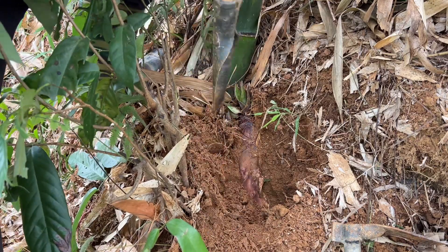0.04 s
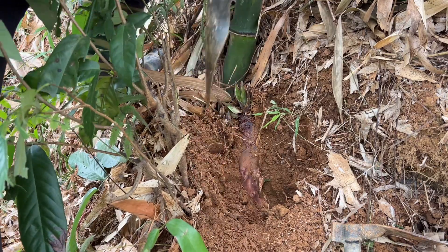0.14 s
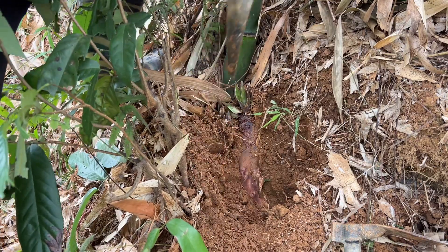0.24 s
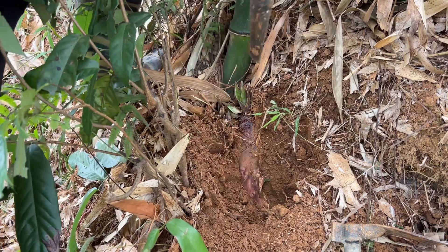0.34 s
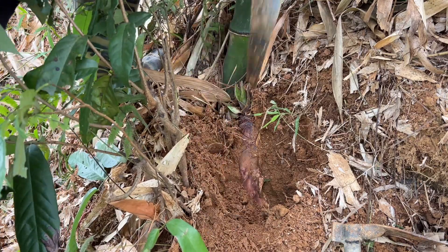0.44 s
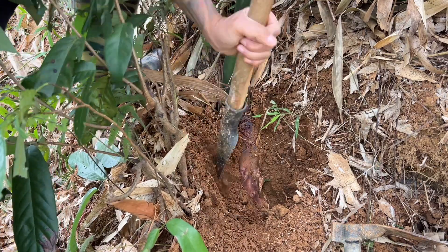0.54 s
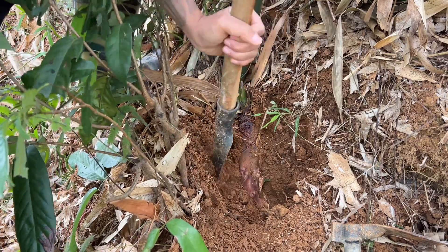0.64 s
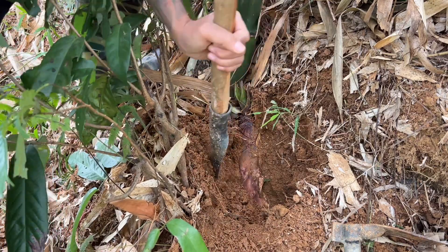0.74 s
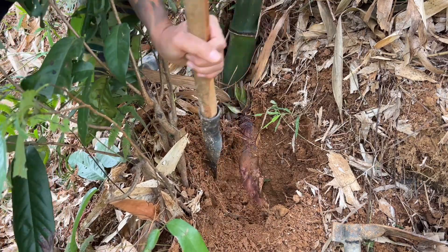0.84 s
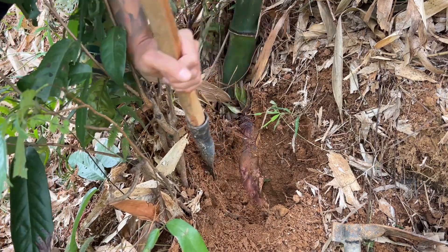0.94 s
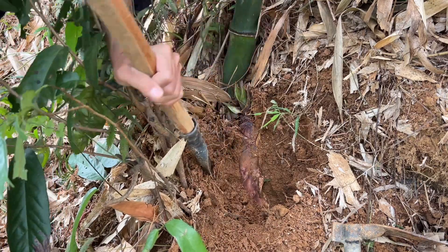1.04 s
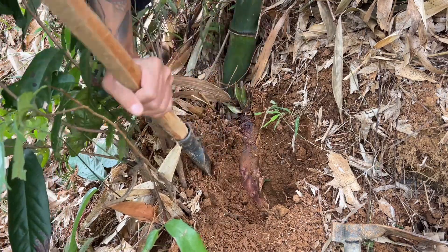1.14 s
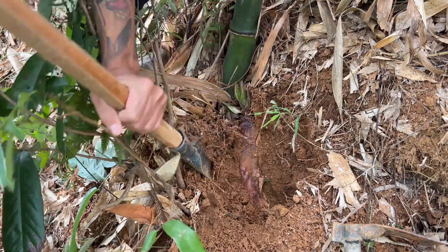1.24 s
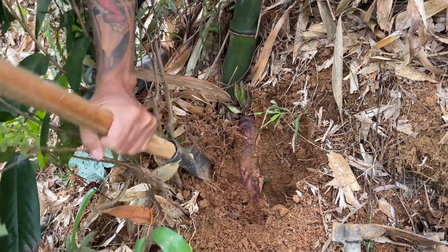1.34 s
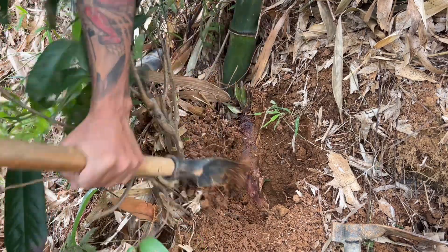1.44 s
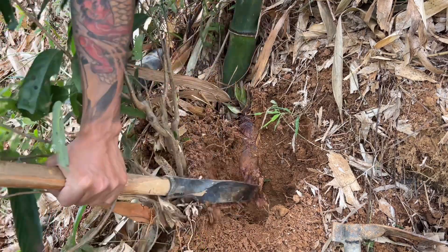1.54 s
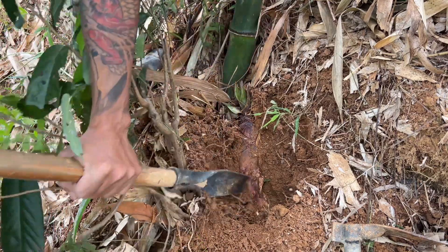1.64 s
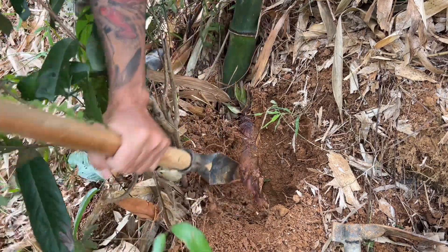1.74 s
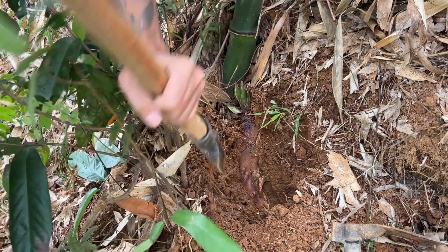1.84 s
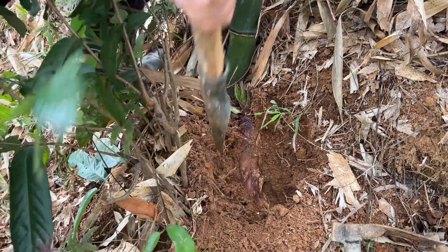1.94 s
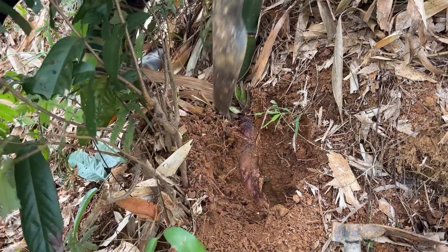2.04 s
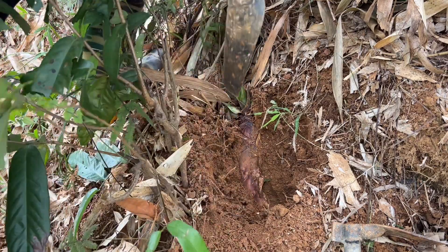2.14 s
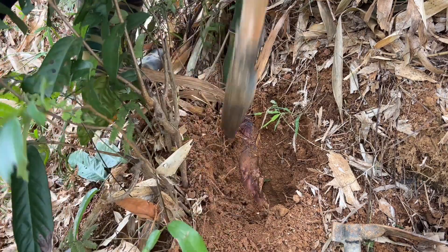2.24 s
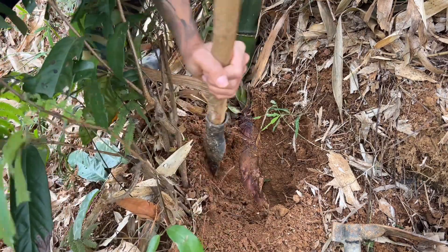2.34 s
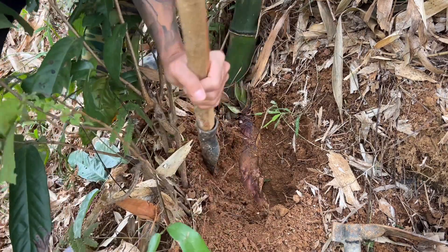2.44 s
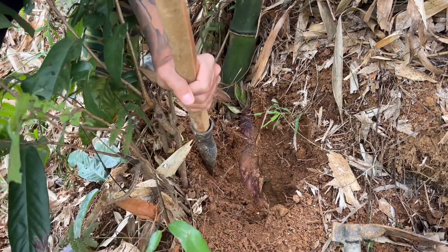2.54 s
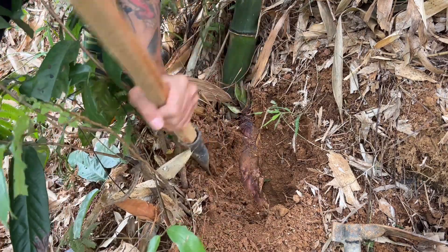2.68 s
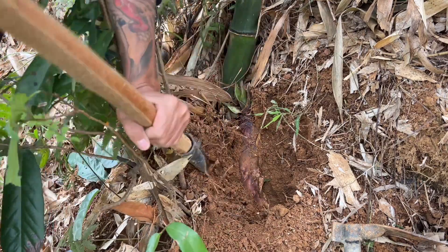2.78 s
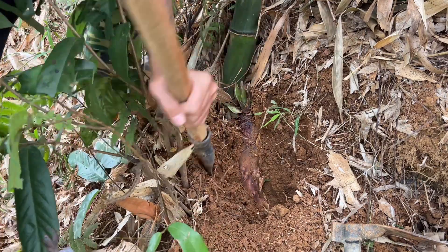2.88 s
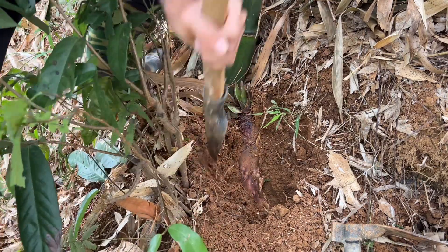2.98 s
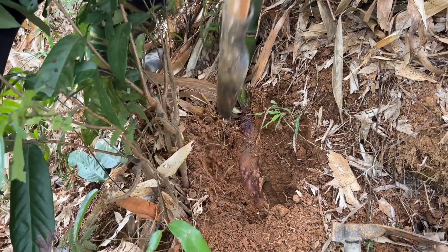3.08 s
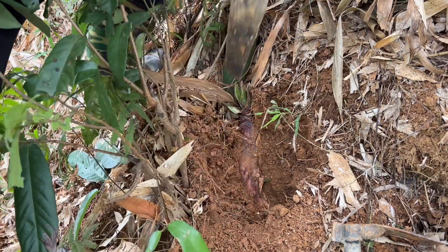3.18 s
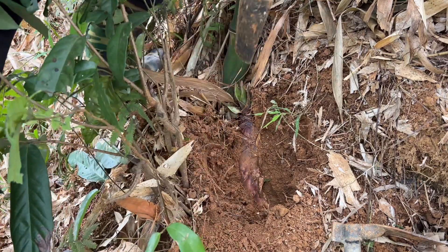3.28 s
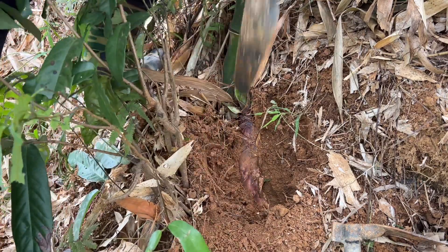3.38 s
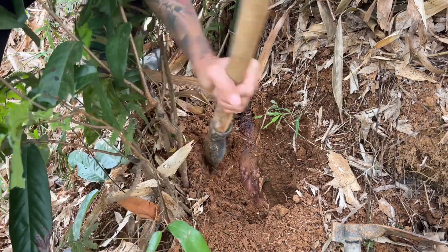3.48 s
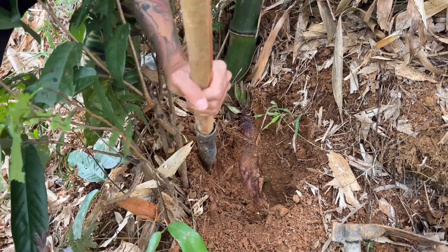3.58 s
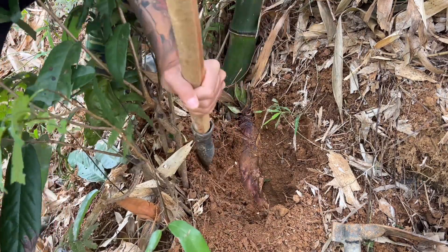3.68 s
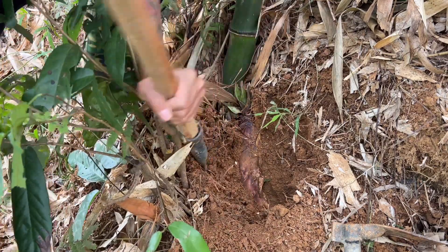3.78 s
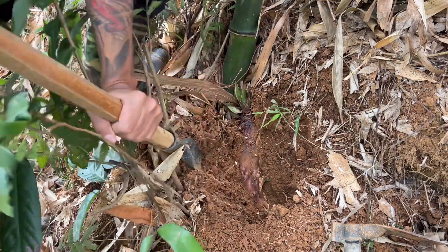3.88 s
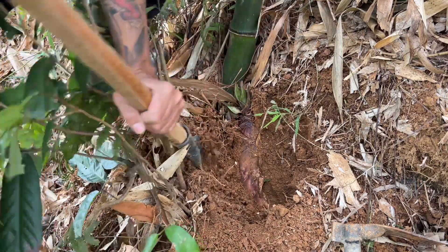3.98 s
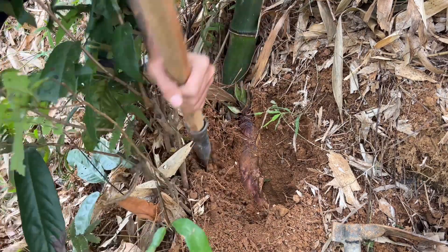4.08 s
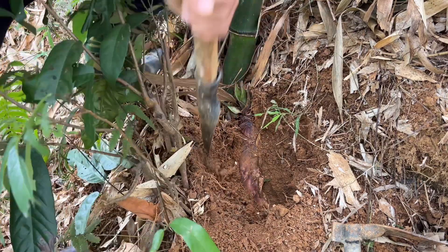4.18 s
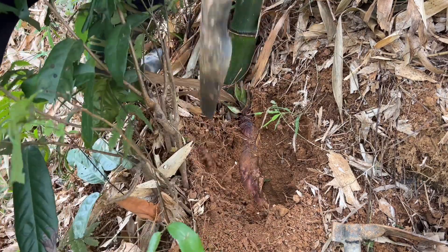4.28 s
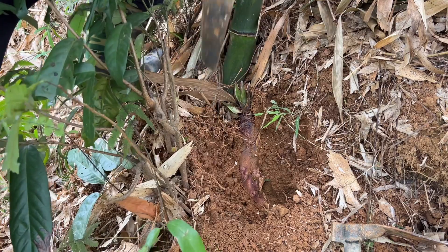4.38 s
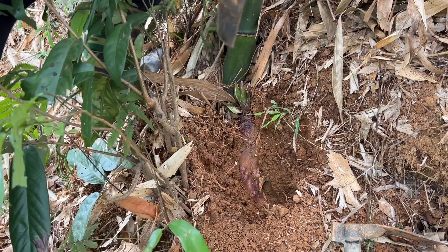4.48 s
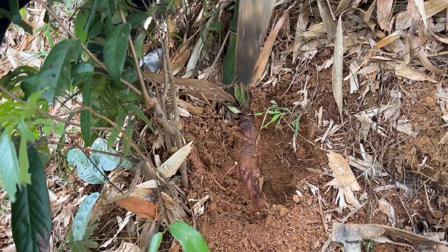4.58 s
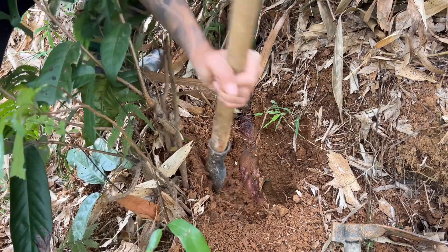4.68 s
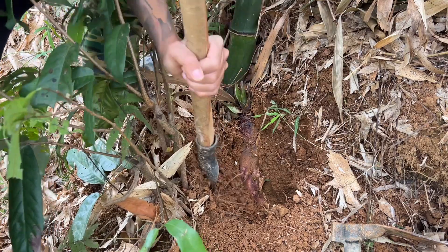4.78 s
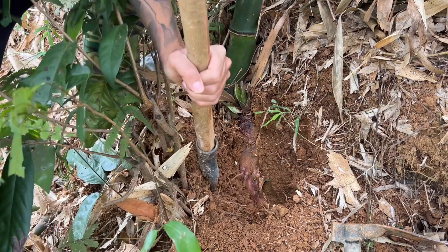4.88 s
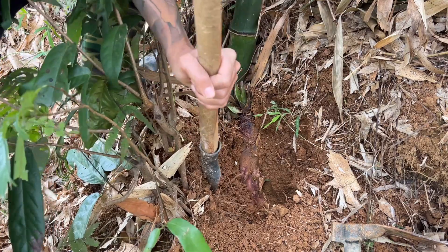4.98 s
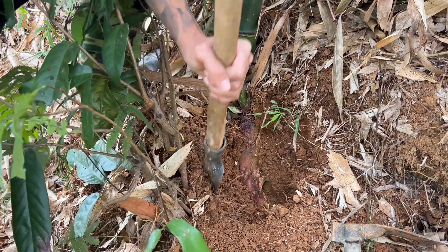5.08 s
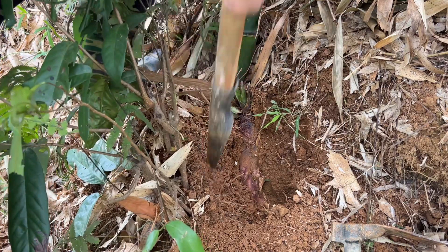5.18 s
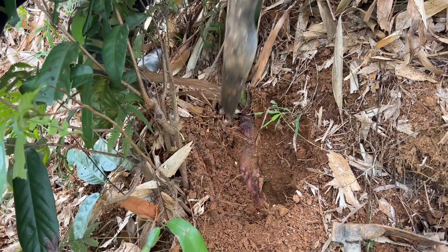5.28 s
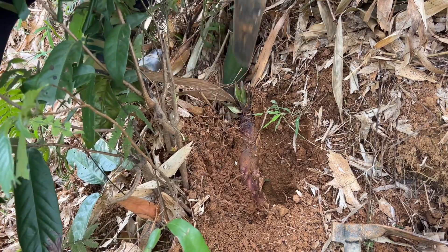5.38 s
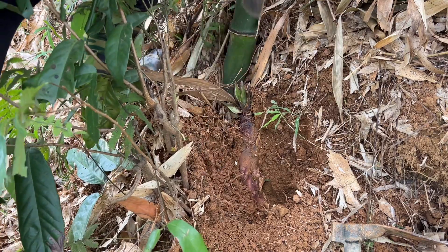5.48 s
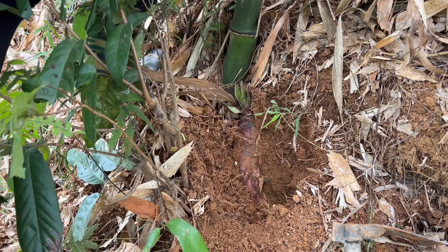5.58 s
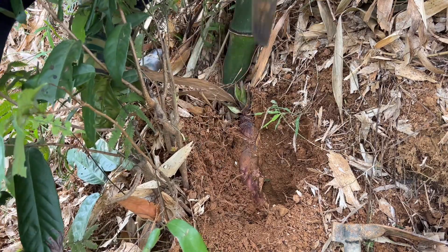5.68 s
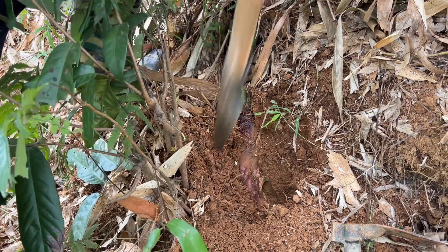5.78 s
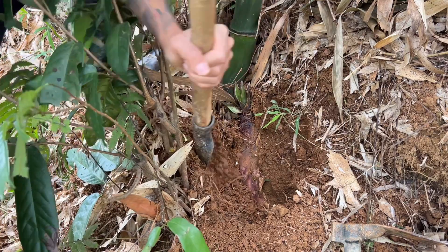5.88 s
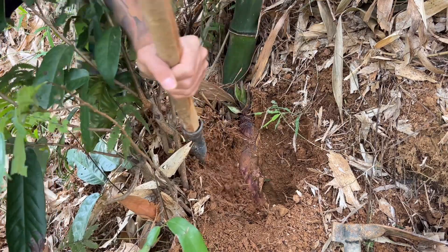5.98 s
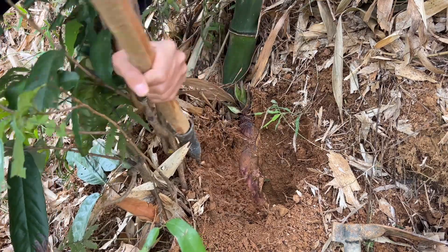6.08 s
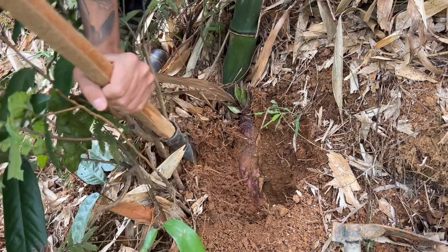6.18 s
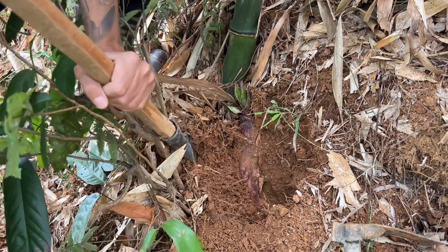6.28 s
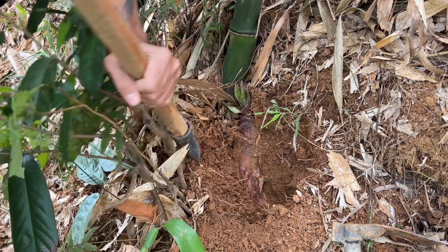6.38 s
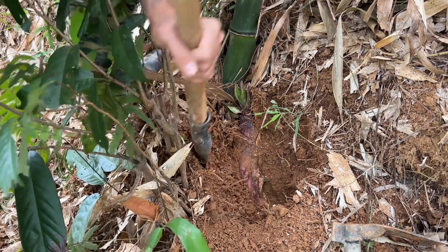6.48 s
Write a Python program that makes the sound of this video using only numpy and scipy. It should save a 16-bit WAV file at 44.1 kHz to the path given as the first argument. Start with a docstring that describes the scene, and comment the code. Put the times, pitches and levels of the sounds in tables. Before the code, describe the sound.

A close outdoor stereo perspective in a grove, nearly dry with a very short diffuse echo. Quiet leaf ticks and faint rustle lead to the first hoe chop at 0.6 seconds: a brief crunch, bright crack, hollow knock and low damped thud. Dull earth shifts follow; around 1.45 to 1.55 the blade clicks on roots, scrapes grit and rings faintly. A firmer chop lands at 2.4, with small knocks and a drag near 2.8. The third, at 3.55, is sharp and woody, then clods patter and grit scrapes near 3.9. The fourth, at 4.75, is softer and duller, with clicks just after. The fifth, at 5.9, is heaviest, followed by strong knocks at 6.05 and 6.3 and dull lurching earth. Crumbs, dry snaps and leaf rustle continue, stronger left. Low air rumble comes in puffs, swelling around 4.2 and at the end near 6.5.

```python
"""A narrow steel hoe on a wooden handle chops five times into soil in a grove, close to the microphone.
Each blow is a crunch of fractures with a short falling squeak, a knock and low damped ground modes.
Between blows the blade catches on roots and stones, drags through grit and rings as it slides free.
Filtered random grains make crumbs, leaves and clods nearby; the grove returns a short noise tail.
Shaped low noise is the moving air that rumbles on the microphone."""
import sys
import numpy as np
from scipy import signal
from scipy.fft import rfft, irfft, next_fast_len
from scipy.io import wavfile

SR = 44100
rng = np.random.default_rng(int(sys.argv[2]) if len(sys.argv) > 2 else 0)


def waveform_to_disk(signal):
    """Save audio, clipped to [-1, 1], as 16-bit WAV at the path in sys.argv[1]."""
    frames = np.transpose(np.atleast_2d(signal))
    scaled = np.clip(frames, -1, 1) * 32767
    samples = np.round(scaled).astype(np.int16)
    wavfile.write(sys.argv[1], SR, samples)


N = 287864
TIME = np.arange(N) / SR
BURST = np.arange(8192) / SR   # time axis of one short sound [s]

# Chops: (blade stops [s], bite length [s], bite below crunch [dB], crunch [dB], blade [dB],
# blade centre [Hz], crack [dB], crack [Hz], knock [dB], knock [Hz], knock rise [s], thud [dB], thud [Hz],
# boom [dB], boom [Hz], crack rise [s], handle [dB], squeak [dB], crumbling [dB])
CHOPS = [(0.6164, 0.012, 9, -20.5, -41, 3260, -14.5, 3130, -10.5, 778, 0.00075, -18, 240, -22.5, 80.4, 0.0005, -36, -41, -40),
         (2.3817, 0.01, 2.5, -21, -25, 1890, -10.5, 1910, -5.5, 705, 0.0009, -14.5, 248, -18.5, 74.4, 0.0012, -29, -36.5, -62),
         (3.5503, 0.0082, 6.5, -17.5, -29.5, 1500, -11.5, 1410, -4.5, 757, 0.00059, -17.5, 246, -18, 70, 0.00073, -21.5, -31, -35.5),
         (4.758, .0125, 13, -18.5, -22, 2260, -29, 1690, -17, 425, 0.0011, -18, 222, -24.5, 69, 0.00077, -25.5, -34, -34),
         (5.902, 0.015, 8, -19, -20.5, 2130, -8.5, 1600, -5.5, 692, 0.00084, -9, 216.5, -19.5, 61.5, 0.00033, -27.5, -34, -35)]
# Steel blade modes: (frequency [Hz], level [dB], longest 60 dB decay [s])
BLADE = [(1080, -13.5, 0.084), (1340, -18.5, 0.04), (1957, -2, 0.052), (2120, 2, 0.36), (2964, -5, 0.23),
         (3240, -4, 0.083), (3560, -4, 0.027), (4550, -7.5, 0.061), (4940, -7, 0.12)]
# Blade response by where the edge meets the soil: (multiple of the centre [ratio], gain [dB])
CONTACT = [(.3, -32), (.6, -2.5), (1, 0), (1.599, 5.5), (3, -5)]
# Crunching soil: (frequency [Hz], density [dB per Hz])
CRUNCH = [(40, -52.5), (200, 4.5), (500, -1.5), (1100, 2), (1600, -2.5), (3000, 0.5), (4500, -3.5),
          (7000, -4), (9000, -3.5), (12000, -8), (16000, -21.5)]
# The edge cuts in small jerks: depth [dB], jerks per second [Hz]
BITE_UNEVEN_DB, BITE_UNEVEN_HZ = 2.4, 700
# The squeak drops in pitch as the soil grips the edge
SQUEAK_START_HZ, SQUEAK_END_HZ, SQUEAK_GRIP_S = 3386, 1900, .003
# Earth breaking apart behind the edge: (frequency [Hz], density [dB per Hz])
CRUMBLING = [(100, 2), (250, -0.5), (480, -8.5), (900, -20), (2000, -20), (5000, -23), (12000, -36)]

# A slab of earth gives way in dull lurches: (time [s], level [dB], frequency [Hz])
LURCHES = [(0.776, -58, 370), (0.804, -45.5, 363), (0.827, -46.5, 383), (0.869, -51, 332),
           (0.893, -60, 385), (6.062, -42.5, 326), (6.108, -45, 350), (6.201, -36, 148), (6.235, -44, 230),
           (6.261, -32, 140), (6.314, -35, 160)]
# The blade catches on roots and stones: (time [s], crack [dB], centre [Hz], rise [s], to the left [dB],
# knock [dB], knock [Hz], knock rise [s], its overtone [dB], ping of the edge [dB], settling bump [dB])
CATCHES = [(1.4532, -34, 2600, 0.00017, 3, -47, 2030, 0.0012, -15, -52, -64),
           (1.4834, -24, 2230, 0.00069, 3.5, -28.5, 1140, 0.0013, 5.5, -26, -37),
           (1.538, -37, 2580, 0.0025, 11, -36, 1076, 0.003, -15, -40, -40),
           (1.8248, -34, 2300, 0.00023, 4, -30, 2540, 0.00038, -10, -50, -47),
           (2.761, -34, 1800, 0.00088, 1, -40, 1310, 0.0012, -16, -52, -40),
           (2.806, -32.5, 2800, 0.00099, 4.5, -46, 1510, 0.0008, -6, -54, -60),
           (2.8086, -38.5, 2630, 0.0013, 3, -23.5, 1240, 0.0011, -21, -46.5, -54),
           (3.8707, -26.5, 3150, 0.001, 3.5, -48, 1240, 0.0011, 0, -54, -43),
           (4.771, -36.5, 2200, 0.0013, 11, -32.5, 586, 0.00045, -9, -48, -31),
           (4.805, -31, 4200, 0.0016, 1.5, -40, 1120, 0.0017, -11, -24.5, -56),
           (4.966, -40.5, 3120, 0.00065, 4, -42.5, 1030, 0.00094, -11, -40, -38.5),
           (6.0415, -25, 2400, 0.0011, 2, -23, 1128, 0.0013, 0.5, -45, -29),
           (6.2791, -28.5, 2720, 0.0011, 0.5, -19, 1700, 0.00039, -1, -27, -50)]
# Spectrum of a catch or a landing clod: (multiple of the centre [ratio], density [dB])
CATCH_SHAPE = [(.02, -46), (.1, 9), (.3, -4), (.6, 7), (1, 7.5), (1.7, 2), (4, -7.5), (12, -15)]
# The thin edge pings briefly; then the blade settles back against the earth
EDGE_HZ, EDGE_T60_S = 4850, 0.018
SETTLE_DELAY_S, SETTLE_HZ, SETTLE_RISE_S = 0.0011, 574, 0.0019

# The blade is dragged through grit: (time [s], length [s], level [dB], ring of the steel [dB])
DRAGS = [(1.473, 0.046, -42.5, -43), (1.527, 0.091, -48, -61), (2.76, 0.056, -41, -59),
         (3.891, 0.054, -48.5, -53)]
# How strongly dragged grit drives the blade's modes: (frequency [Hz], gain [dB])
DRAG_DRIVE = [(1100, 21), (2000, 1.5), (3200, 0), (5000, 6)]
# Grit scraped by the steel: (frequency [Hz], density [dB per Hz])
SCRAPED_GRIT = [(60, -11), (200, 5.5), (450, -14.5), (850, -15.5), (1300, -1), (2600, 0), (4000, 3),
                (6000, -6), (9000, 0), (16000, -18)]
# Stick and slip: typical gap, its spread as a log ratio, decay of a slip, share of scraping between slips
SLIP_GAP_S, SLIP_SPREAD, SLIP_S, SLIP_BETWEEN = .0056, .25, .0011, .25
# The blade slides free and rings: (time [s], rise of the rub [s], relative level [dB], centre [Hz])
RELEASES = [(1.492, 0.013, -46, 2280), (3.002, 0.017, -53.5, 2380), (4.16, 0.014, -50, 2600),
            (5.19, 0.015, -53.5, 2680)]

# The loudest snaps of dry leaves and twigs: (time [s], relative level [dB], centre [Hz])
SNAPS = [(0.0184, -35.5, 5030), (0.061, -52, 3960), (0.087, -45, 3500), (0.096, -43, 1900),
         (0.2504, -45.5, 1430), (0.418, -38.5, 1040), (0.4995, -42, 7100), (0.8045, -47.5, 1490),
         (0.8923, -37.5, 2520), (0.921, -45, 2200), (1.0062, -33.5, 8050), (1.1445, -43, 4450),
         (1.3255, -32, 9100), (1.3505, -36, 1850), (1.41, -32, 8200), (1.5692, -29.5, 4710),
         (2.1275, -42, 5900), (2.3294, -34, 6000), (2.3525, -42, 8500), (2.459, -43, 5500),
         (2.5615, -51.5, 5460), (2.7236, -38.5, 2190), (2.8254, -28.5, 8600), (2.8665, -42, 4400),
         (2.9035, -38, 4220), (3.341, -41.5, 4500), (3.59, -38.5, 4500), (3.647, -43, 3000),
         (3.9005, -29.5, 3700), (4.0458, -29, 9000), (4.341, -46.5, 6100), (4.408, -50, 3020),
         (4.5545, -43.5, 7700), (4.649, -47, 3960), (4.8479, -38, 2460), (4.978, -43, 8150),
         (5.061, -41, 4930), (5.4207, -43.5, 7250), (5.5519, -38.5, 1790), (5.6565, -39.5, 7800),
         (6.2415, -36, 4180)]
# Spectrum of a snap: (multiple of the centre [ratio], density [dB])
SNAP_SHAPE = [(.02, -68), (.1, 3.5), (.3, -9.5), (1, 9.5), (1.7, 2), (6, -17)]
# Fainter snaps come by chance; their level is relative to the rustle of the moment
FAINT_SNAP_COUNT, FAINT_SNAP_DB, FAINT_SNAP_SPREAD_DB, FAINT_SNAP_HZ = 16, 15, 2.5, (1500, 8000)
# Single clods land on the litter: (time [s], relative level [dB], centre [Hz])
LANDINGS = [(1.5625, -36, 1280), (1.605, -51, 1100), (3.908, -48, 1810), (3.945, -55, 2000),
            (3.962, -43.5, 1320), (3.987, -42, 1450), (4.099, -48, 2610), (4.111, -55, 2510),
            (4.305, -53, 2500), (4.709, -41.5, 1860), (4.852, -40, 795), (5.389, -51.5, 1300),
            (5.8385, -42, 1960)]
# How the two ports hear the hoe; the left port resonates higher than the right
# (frequency [Hz], left microphone louder [dB])
PORT_BALANCE = [(100, .2), (250, 0), (500, -.5), (900, 2), (2400, 1.6), (4200, 2.6), (6200, 1.2), (8200, 1),
                (11000, -.2)]
# (frequency [Hz], left microphone leads [rad])
PORT_PHASE = [(100, .08), (300, .3), (800, .55), (1600, .55), (2400, .9), (3200, 1.4), (4500, .9),
              (7000, .1), (8200, -1.2), (9000, -2.3), (10300, -3.2), (11500, -4.4), (12400, -5.8),
              (16000, -7.2)]

# The blade lifts earth out, which trickles back: (time [s], length [s], relative level [dB], fall [dB/s])
LIFTS = [(1.502, 0.026, -59, 27), (2.763, 0.016, -61.5, 86.5), (3.894, 0.24, -60.5, 54.5),
         (6.205, 0.096, -64, 51)]
LIFT_ATTACK_S = 0.056
# Every chop throws up a spray of earth
SPRAY_DB, SPRAY_ATTACK_S, SPRAY_FALL_DB_PER_S = -62.5, 0.12, 49.5
# Leaves and clods that running earth sets off, relative to its crumbs
SPILL_LEAVES_DB, SPILL_CLODS_DB = 8, 1.5
# Hoe and arm brush through the foliage: (time [s], length [s], relative level [dB])
BRUSHES = [(0.025, 0.058, -57), (0.978, 0.31, -60.5), (1.352, 0.05, -52.5), (1.798, 0.044, -57),
           (2.108, 0.062, -66), (2.924, 0.0065, -55.5), (5.126, 0.32, -61.5), (5.671, 0.017, -58),
           (6.47, 0.093, -60.5)]
BRUSH_ATTACK_S, BRUSH_FALL_DB_PER_S, BRUSH_CRUMBS_DB = 0.054, 76.5, -10
# Each downswing stirs the leaves just before the blow
SWING_LEAD_S, SWING_DB = 0.19, -64
# The grove at rest, relative levels
REST_CRUMBS_DB, REST_LEAVES_DB, REST_CLODS_DB = -76.5, -68.5, -74

# Running crumbs: (frequency [Hz], density [dB per Hz])
CRUMBS = [(100, -27.5), (300, 0), (600, -5.5), (1300, -6.5), (2500, -3.5), (4000, -6.5), (7000, -15),
          (16000, -54.5)]
# Running earth comes in lumps: spread of grain strength, depth of the lumps
CRUMB_SPREAD_DB, CRUMB_LUMPS_DB = 2.9, 2.6
# Small pellets of soil land one by one; level relative to the trickle
PELLETS_PER_S, PELLET_DB, PELLET_HZ = 85, 2.5, (900, 6500)
# Rustling leaves: (frequency [Hz], density [dB per Hz])
LEAVES = [(1500, -46), (3000, -11), (4500, -3.5), (7000, -1), (9500, 0), (12000, -3), (16000, -4.5)]
# The leaves stir unevenly: depth [dB], changes per second [Hz]
LEAF_SWAY_DB, LEAF_SWAY_HZ = 1.2, 22
# Tumbling clods: (frequency [Hz], density [dB per Hz])
CLODS = [(80, -23), (160, 1.5), (260, -4.5), (400, -19.5), (470, -7), (600, 0.5), (1500, -33)]
# The handle is leant on and the packed earth shifts: (time [s], length [s], level [dB])
HEAVES = [(0.803, 0.082, -54), (1.37, 0.022, -58.5), (1.518, 0.091, -54), (3.81, 0.027, -58.5),
          (3.876, 0.12, -51.5), (4.704, 0.027, -59), (5.996, 0.35, -53.5)]
HEAVE_ATTACK_S, HEAVE_FALL_DB_PER_S = 0.14, 500
# Dull grinding of packed earth: (frequency [Hz], density [dB per Hz])
PACKED_EARTH = [(60, -26.5), (130, 2.5), (250, -0.5), (390, 0), (470, -2.5), (580, -28), (1500, -55)]
# The litter mostly lies to the left: (frequency [Hz], left microphone louder [dB])
LITTER_BALANCE = [(200, -1), (900, 5), (2500, 4.5), (5500, 8), (7500, 0), (16000, 1.5)]
# Phase between the microphones for the litter: (frequency [Hz], left microphone leads [rad])
LITTER_PHASE = [(100, .1), (800, 1), (1500, 1.1), (2800, 2.3), (4500, .6), (6000, 1.3), (7300, 0),
                (8500, -1.4), (10200, -3.15), (11500, -4.3), (13200, -6.2), (14400, -6.6), (16000, -9)]
# Stereo width of the nearby litter: (frequency [Hz], left-right likeness [-1 to 1])
LITTER_LIKENESS = [(60, .98), (500, .85), (1500, .55), (3500, .3), (6000, .35), (7300, .78), (8700, .75),
                   (10200, .97), (12000, .65), (13500, .88), (16000, .6)]

# Stereo width of echoes and moving air: (frequency [Hz], left-right likeness [-1 to 1])
LIKENESS = [(60, .983), (130, .99), (290, .86), (640, .4), (1400, .12), (3000, 0), (15000, -.05)]
# Rumble of air on the microphone: (time [s], level before BREEZE_DB is added [dB])
BREEZE = [(0.0, -55.5), (0.56, -70), (0.8, -53), (0.93, -65.5), (2.07, -67.5), (2.45, -52.5), (2.6, -64),
          (3.09, -53), (3.38, -63.5), (4.18, -45), (4.56, -51.5), (5.16, -60), (5.29, -53.5), (5.91, -54.5),
          (6.09, -52.5), (6.53, -39)]
BREEZE_DB = 3.5
# Stronger puffs of air: (time [s], length [s], level [dB])
GUSTS = [(0.344, 0.0076, -42), (0.887, 0.01, -40), (1.503, 0.061, -46), (2.251, 0.071, -46),
         (3.137, 0.0049, -51), (3.878, 0.23, -39), (4.165, 0.1, -35), (4.449, 0.0038, -35.5),
         (4.62, 0.023, -42.5), (5.152, 0.063, -41.5), (5.306, 0.017, -37.5), (5.448, 0.0083, -34),
         (6.045, 0.072, -34.5), (6.19, 0.12, -34.5)]
GUST_ATTACK_S, GUST_FALL_DB_PER_S = 0.015, 371
# Moving air: (frequency [Hz], density [dB per Hz])
AIR = [(10, -52.5), (25, -15.5), (42, 2), (60, 2), (85, -2), (120, -10.5), (180, -25.5), (300, -30.5),
       (800, -62.5)]


def from_db(db):
    """Decibels to gain."""
    return 10 ** (np.asarray(db) / 20)


def rms_one(x):
    """Scale to rms 1."""
    return x / np.sqrt(np.mean(x ** 2) + 1e-20)


def in_time(rows):
    """Each column of a curve at every sample."""
    s, *columns = np.transpose(rows)
    return [np.interp(TIME, s, column) for column in columns]


def at_hz(points, hz):
    """Read a spectrum on a log-frequency axis."""
    where, value = np.transpose(points)
    return np.interp(np.log(hz + 1e-6), np.log(where), value)


def colour(x, spectrum, centre=1):
    """Give a signal a spectrum whose frequencies are multiples of centre."""
    size = next_fast_len(x.shape[-1])
    gain = from_db(at_hz(spectrum, np.fft.rfftfreq(size, 1 / SR) / centre))
    return irfft(rfft(x, size) * gain, size)[..., :x.shape[-1]]


def add(out, s, sound):
    """Mix a sound in at time s."""
    start = max(round(s * SR), 0)
    out[..., start:start + sound.shape[-1]] += sound[..., :N - start]


def grit(size, per_s, spread_db):
    """Random tiny fractures: many weak ones, a few strong."""
    strength = from_db(spread_db * np.minimum(rng.exponential(1, size), 4))
    happens = rng.random(size) < per_s / SR
    return rms_one(happens * strength * rng.choice([-1, 1], size))


def clumps(size, depth_db, rate_hz):
    """A gain that wanders at random, as when earth falls in lumps."""
    count = 4096
    wander = np.interp(TIME[:size] * rate_hz, np.arange(count), rng.standard_normal(count))
    return from_db(depth_db * wander)


def shaped(grain, envelope):
    """Put grain under an envelope, with the energy that the envelope promises."""
    return rms_one(grain * envelope) * np.sqrt(np.mean(envelope ** 2))


def swell(t, rise):
    """Builds to 1 at the rise time, then dies away."""
    u = np.maximum(t, 0) / rise
    return (u * np.exp(1 - u)) ** 2


def surge(s, length, db, attack_s, fall_db_per_s):
    """Power of a movement that builds up to time s, holds for its length and dies away."""
    building = np.clip(1 + (TIME - s) / attack_s, 0, 1)
    falling = from_db(db - fall_db_per_s * np.maximum(TIME - s - length, 0))
    return (building * falling) ** 2


def heave(hz, rise, sag=0):
    """A heavily damped mode; its pitch sags as the soil yields and passes hz at the peak."""
    pitch = hz * (1 + sag * (np.exp(-BURST / rise) - np.exp(-1)))
    return swell(BURST, rise) * np.sin(2 * np.pi * np.cumsum(pitch) / SR)


def blade_ring(longest):
    """The blade's answer to a tap; soil around it limits how long any mode lasts."""
    t = TIME[:SR // 2]
    return sum(from_db(db - 60 * t / min(t60, longest)) * np.sin(2 * np.pi * hz * t)
               for hz, db, t60 in BLADE)


def scatter(pair, likeness=LIKENESS):
    """Two unrelated signals become a stereo field with a given likeness of left and right."""
    size = next_fast_len(pair.shape[-1])
    alike = np.clip(at_hz(likeness, np.fft.rfftfreq(size, 1 / SR)), -1, 1)
    mid, side = irfft(rfft(pair, size) * np.sqrt([1 + alike, 1 - alike]), size)[:, :pair.shape[-1]]
    return np.array([mid + side, mid - side])


def two_ports(x, balance, phase):
    """The two microphone ports colour and delay a source differently."""
    size = next_fast_len(N)
    hz = np.fft.rfftfreq(size, 1 / SR)
    # each port takes half of the difference in level and phase
    half = from_db(at_hz(balance, hz) / 2) * np.exp(.5j * at_hz(phase, hz))
    return irfft(rfft(x, size) * np.array([half, 1 / half]), size)[:, :N]


def chops(fall_s=0.0033, tail_db=-30, tail_s=0.06, rebound_db=-6, rebound_hz=122, handle_hz=345):
    """A crunch grows as the edge cuts in; the stop gives a crack, a knock and ever slower ground waves."""
    out = np.zeros(N)
    buried = blade_ring(.024)
    for (s, bite, bite_db, crunch_db, blade_db, blade_hz, crack_db, crack_hz,
         knock_db, knock_hz, knock_rise, thud_db, thud_hz, boom_db, boom_hz, crack_rise, handle_db, *_) in CHOPS:
        t = BURST - bite   # zero when the blade stops
        entering = from_db(-bite_db) * (BURST / bite) ** 0.51 * (t < 0)
        after = from_db(tail_db) * np.exp(-np.abs(t) / tail_s) * (t >= 0)
        force = entering + after + np.exp(-np.abs(t - .0004) / fall_s)
        fractures = grit(len(t), 26000, 1.0) * clumps(len(t), BITE_UNEVEN_DB, BITE_UNEVEN_HZ)
        crunch = shaped(rms_one(colour(fractures, CRUNCH)), force)
        # the steel is driven only while it moves
        steel = signal.fftconvolve(crunch * (t < .002), buried)[:len(t)]
        steel = rms_one(colour(steel, CONTACT, blade_hz)) * np.sqrt(np.mean(force ** 2))
        add(out, s - bite, from_db(crunch_db) * crunch + from_db(blade_db) * steel)
        add(out, s - .0011, from_db(crack_db) * heave(crack_hz, crack_rise, sag=0.17))
        add(out, s - .0002, from_db(knock_db) * heave(knock_hz, knock_rise, sag=0.83))
        add(out, s + 0.003, from_db(thud_db) * heave(thud_hz, rise=0.0044, sag=0.67))
        add(out, s, from_db(handle_db) * heave(handle_hz, rise=0.0071))   # the gripped handle flexes
        add(out, s + 0.01504, from_db(boom_db) * heave(boom_hz, rise=0.011, sag=0.3))
        add(out, s + 0.014, from_db(boom_db + rebound_db) * heave(rebound_hz, rise=0.012))
    return out


def squeaking(rough_db=2.0, stop_s=.001):
    """The steel sings while it cuts in, lower as it sinks, and is choked when it stops."""
    out = np.zeros(N)
    pitch = SQUEAK_END_HZ + (SQUEAK_START_HZ - SQUEAK_END_HZ) * np.exp(-BURST / SQUEAK_GRIP_S)
    for s, bite, *_, squeak_db, _crumbling_db in CHOPS:
        force = np.minimum(BURST / SQUEAK_GRIP_S, 1) * np.exp(-np.maximum(BURST - bite, 0) / stop_s)
        tone = np.sin(2 * np.pi * np.cumsum(pitch) / SR) * clumps(len(BURST), rough_db, 850)
        add(out, s - bite, from_db(squeak_db) * force * tone)
    return out


def crumbling(rise_s=0.012, fall_s=0.03):
    """The cut slab breaks up in a burst of fractures just after each stop."""
    out = np.zeros(N)
    envelope = np.minimum(BURST / rise_s, np.exp((rise_s - BURST) / fall_s))
    for s, *_, crumbling_db in CHOPS:
        grain = colour(grit(len(BURST), 900, 0.83), CRUMBLING)
        add(out, s, from_db(crumbling_db) * shaped(grain, envelope))
    return out


def lurches(rise_s=0.0062):
    """Each lurch of the levered slab is a soft low bump."""
    out = np.zeros(N)
    for s, db, hz in LURCHES:
        add(out, s, from_db(db) * heave(hz, rise_s))
    return out


def catches(overtone_ratio=1.71, steel_db=-17, ping_rise_s=0.0026):
    """A root or stone gives way: a noisy crack, a short knock, a steel ring and a bump as the blade settles."""
    out = np.zeros((2, N))
    buried = blade_ring(.02)[:len(BURST)]
    ping_envelope = np.minimum(BURST / ping_rise_s, 1) * from_db(-60 * BURST / EDGE_T60_S)
    ping = ping_envelope * np.sin(2 * np.pi * EDGE_HZ * BURST)
    settle = heave(SETTLE_HZ, SETTLE_RISE_S, sag=0.16)
    for s, db, hz, rise, left_db, knock_db, knock_hz, knock_rise, overtone_db, ping_db, settle_db in CATCHES:
        grain = colour(rng.standard_normal(len(BURST)), CATCH_SHAPE, hz)
        envelope = swell(BURST, rise) + 0.13 * swell(BURST, 4 * rise)
        crack = shaped(grain, envelope) + from_db(steel_db) * buried
        overtone = from_db(overtone_db) * heave(knock_hz * overtone_ratio, knock_rise)
        knock = heave(knock_hz, knock_rise, sag=0.087) + overtone
        sound = from_db(db) * crack + from_db(knock_db) * knock + from_db(ping_db) * ping
        add(out, s, from_db(left_db * np.array([[.5], [-.5]])) * sound)
        add(out, s + SETTLE_DELAY_S, from_db(settle_db) * settle)
    return out


def dragging():
    """The blade moves through grit in uneven slips, each a tiny crunch that rings the half-buried steel."""
    out = np.zeros(N)
    buried = blade_ring(.06)
    for s, length, db, steel_db in DRAGS:
        stroke = np.clip(np.minimum(BURST / 0.0015, (length - BURST) / 0.021), 0, 1)
        gaps, forces = rng.standard_normal((2, 40))
        slip_times = np.cumsum(SLIP_GAP_S * np.exp(SLIP_SPREAD * gaps))
        since = BURST - slip_times[:, None]
        slips = from_db(4.1 * forces) @ (np.exp(-np.abs(since) / SLIP_S) * (since >= 0))
        fractures = grit(len(BURST), 11000, 1.9) * (SLIP_BETWEEN + slips)
        steel = colour(signal.fftconvolve(fractures, buried)[:len(BURST)], DRAG_DRIVE)
        scrape = shaped(colour(fractures, SCRAPED_GRIT), stroke)
        add(out, s, from_db(db) * scrape + from_db(steel_db) * shaped(steel, stroke))
    return out


def releases(waver_db=5.0, rasp_db=-7):
    """The steel rings as it slides free; the contact wanders, so each mode comes and goes on its own."""
    out = np.zeros(N)
    t = BURST
    for s, rise, db, centre_hz in RELEASES:
        ring = 0
        for hz, mode_db, t60 in BLADE:
            rubbing = grit(len(t), 1200, 7.8) * swell(t, rise)
            mode = from_db(-60 * t / min(t60, .13)) * np.sin(2 * np.pi * hz * t)
            answer = signal.fftconvolve(rubbing, mode)[:len(t)] * clumps(len(t), waver_db, 210)
            ring = ring + from_db(mode_db) * rms_one(answer)
        rasp = rms_one(colour(grit(len(t), 2000, 2.3) * swell(t, rise), CRUNCH))
        rub = rms_one(ring) + from_db(rasp_db) * rasp
        add(out, s, from_db(db - 5.5) * rms_one(colour(rub, CONTACT, centre_hz)))
    return out


def ticks(rows, shape, level_db, rise, tail, ring_db=-5, ring_rise=0.00063):
    """Short noise bursts, each with a brief ring of the struck leaf and a weaker, slower tail."""
    out = np.zeros(N)
    for s, db, hz in rows:
        grain = colour(rng.standard_normal(len(BURST)), shape, hz)
        burst = shaped(grain, swell(BURST, rise) + tail * swell(BURST, 4 * rise))
        ring = from_db(ring_db) * heave(hz, ring_rise, sag=.15)
        add(out, s, from_db(db + level_db) * (burst + ring))
    return out


def faint_snaps(rustle):
    """Rows like those of SNAPS, at random times and pitches, louder where the leaves move more."""
    low, high = FAINT_SNAP_HZ
    rows = []
    for when, force, pitch in rng.random((FAINT_SNAP_COUNT, 3)):
        rustle_db = 20 * np.log10(rustle[int(when * N)])
        db = rustle_db + FAINT_SNAP_DB + FAINT_SNAP_SPREAD_DB * (2 * force - 1)
        rows.append((when * N / SR, db, low * (high / low) ** pitch))
    return rows


def snaps(rustle):
    """Thin dry cracks in the litter, and the duller pats of landing clods."""
    cracks = ticks(SNAPS + faint_snaps(rustle), SNAP_SHAPE, level_db=-7, rise=0.00092, tail=0.26)
    pats = ticks(LANDINGS, CATCH_SHAPE, level_db=-3, rise=0.0013, tail=0.44)
    return cracks + pats


def stirring():
    """How strongly crumbs, leaves and clods move as the work goes on: summed powers made into three gains."""
    spill = sum(surge(s, 0, SPRAY_DB, SPRAY_ATTACK_S, SPRAY_FALL_DB_PER_S) for s, *_ in CHOPS)
    spill += sum(surge(s, length, db, LIFT_ATTACK_S, fall) for s, length, db, fall in LIFTS)
    brush = sum(surge(*row, BRUSH_ATTACK_S, BRUSH_FALL_DB_PER_S) for row in BRUSHES)
    brush += sum(surge(s - SWING_LEAD_S, SWING_LEAD_S, SWING_DB, BRUSH_ATTACK_S, BRUSH_FALL_DB_PER_S)
                 for s, *_ in CHOPS)
    crumbs = spill + brush * from_db(BRUSH_CRUMBS_DB) ** 2 + from_db(REST_CRUMBS_DB) ** 2
    leaves = brush + spill * from_db(SPILL_LEAVES_DB) ** 2 + from_db(REST_LEAVES_DB) ** 2
    clods = spill * from_db(SPILL_CLODS_DB) ** 2 + from_db(REST_CLODS_DB) ** 2
    return np.sqrt([crumbs, leaves, clods])


def litter(spectrum, per_s, spread_db, smooth, clump_db):
    """Grains falling all around in lumps, the far ones merged into a hiss."""
    pair = grit((2, N), per_s, spread_db) + smooth * rng.standard_normal((2, N))
    return rms_one(colour(scatter(pair * clumps(N, clump_db, 110), LITTER_LIKENESS), spectrum))


def pellets(count=12, rise_cycles=1.4):
    """Separate pats of soil on dry leaves, each a few cycles long at one of several pitches."""
    landings = grit(N, PELLETS_PER_S, 1.8)
    dealt = rng.integers(0, count, N)
    out = 0
    for k, hz in enumerate(np.geomspace(*PELLET_HZ, count)):
        pat = rms_one(heave(hz, rise_cycles / hz)[:SR // 80])
        out = out + signal.oaconvolve(landings * (dealt == k), pat)[:N]
    return rms_one(out)


def grinding():
    """Packed earth grinds dully under the blade while the handle is leant on."""
    power = sum(surge(*row, HEAVE_ATTACK_S, HEAVE_FALL_DB_PER_S) for row in HEAVES)
    return np.sqrt(power) * litter(PACKED_EARTH, per_s=140, spread_db=4.5, smooth=0.93, clump_db=7.0)


def grove(x, level_db=-23, t60=0.22):
    """Stems and leaves throw back a thin, short tail."""
    t = TIME[:SR // 2]
    tail = scatter(rng.standard_normal((2, len(t)))) * from_db(-60 * t / t60) * (t > .004)
    tail = colour(tail, [(60, 25.0), (300, -4.5), (1500, 6.0), (6000, -24.0), (16000, 12.5)])
    echo = rms_one(tail) / np.sqrt(len(t))
    return from_db(level_db) * signal.fftconvolve(x[None], echo, axes=1)[:, :N]


def wind(lump_db=2.5, lump_hz=18):
    """A lumpy breeze and single puffs rumble on the microphone."""
    breeze_db, = in_time(BREEZE)
    breeze = from_db(breeze_db + BREEZE_DB) * clumps(N, lump_db, lump_hz)
    puffs = sum(surge(*row, GUST_ATTACK_S, GUST_FALL_DB_PER_S) for row in GUSTS)
    rumble = rms_one(colour(scatter(rng.standard_normal((2, N))), AIR))
    return np.sqrt(breeze ** 2 + puffs) * rumble


def scene():
    """Hoe close by, earth and litter around it, the grove's echo and moving air."""
    trickle, rustle, tumble = stirring()
    blows = chops() + squeaking() + crumbling() + lurches()
    sliding = (dragging() + releases()) * from_db([[1], [-1]])   # a little to the left
    hoe = blows + catches() + snaps(rustle) + sliding
    running = litter(CRUMBS, per_s=600, spread_db=CRUMB_SPREAD_DB, smooth=1.0, clump_db=CRUMB_LUMPS_DB)
    crumbs = trickle * (from_db(10.0) * running + from_db(PELLET_DB) * pellets())
    sway = clumps(N, LEAF_SWAY_DB, LEAF_SWAY_HZ)
    dry_leaves = litter(LEAVES, per_s=1700, spread_db=3.0, smooth=1.0, clump_db=2.0)
    leaves = rustle * sway * from_db(2.5) * dry_leaves
    clods = tumble * from_db(0.5) * litter(CLODS, per_s=1500, spread_db=1.5, smooth=1.0, clump_db=4.5)
    ground = two_ports(crumbs + leaves + clods + grinding(), LITTER_BALANCE, LITTER_PHASE)
    direct = two_ports(hoe, PORT_BALANCE, PORT_PHASE)
    return direct + grove(hoe.mean(axis=0)) + ground + wind()


def record(dry):
    """The microphone loses the deepest bass; a steep low-pass cuts the top."""
    toned = colour(dry, [(12, -8), (25, -2), (40, -3), (60, 0)])
    top_cut = signal.ellip(10, .2, 70, 16000, fs=SR, output="sos")   # order, ripple dB, stop dB, Hz
    return signal.sosfilt(top_cut, toned)


dry = scene()
out = record(dry)
waveform_to_disk(out)
```